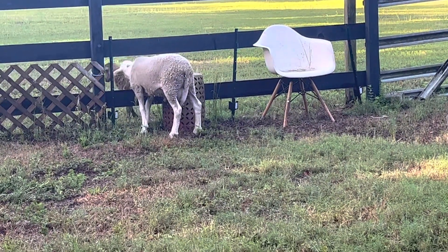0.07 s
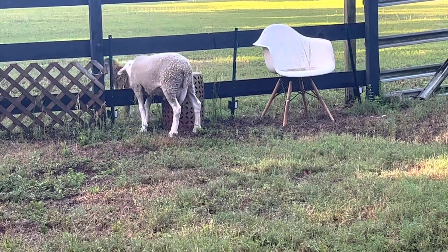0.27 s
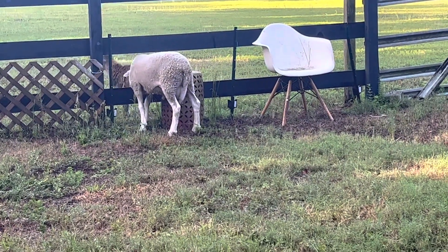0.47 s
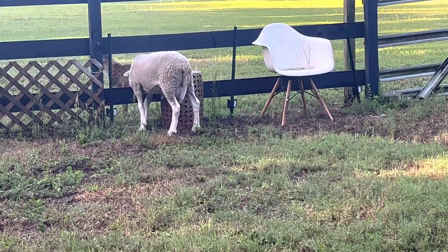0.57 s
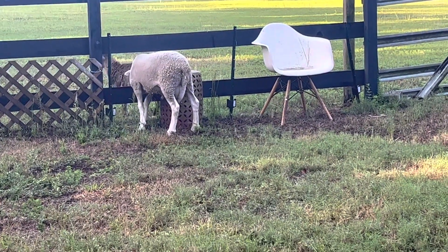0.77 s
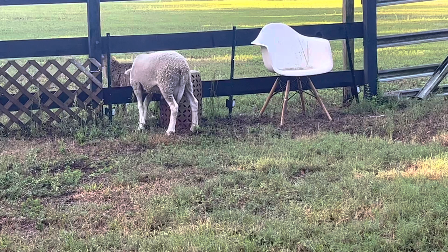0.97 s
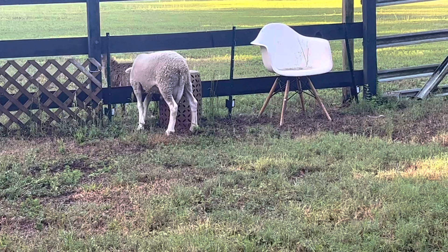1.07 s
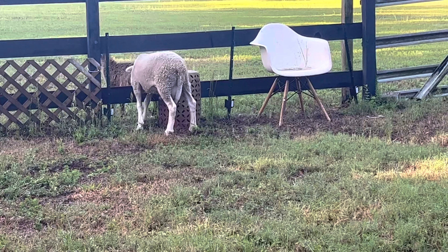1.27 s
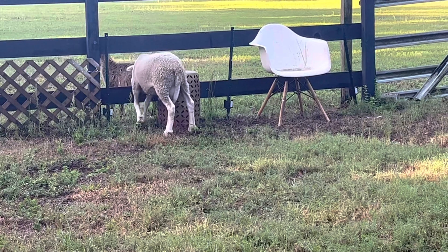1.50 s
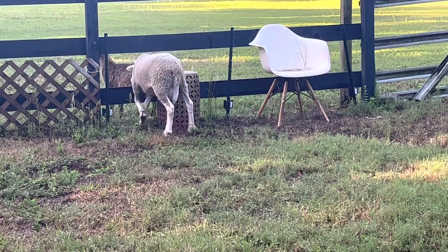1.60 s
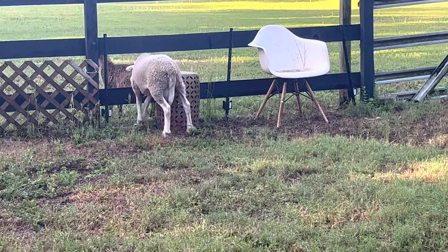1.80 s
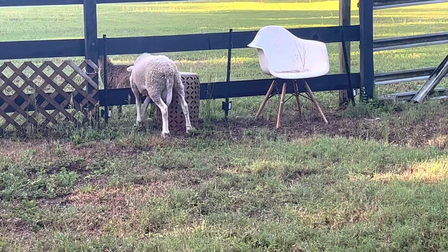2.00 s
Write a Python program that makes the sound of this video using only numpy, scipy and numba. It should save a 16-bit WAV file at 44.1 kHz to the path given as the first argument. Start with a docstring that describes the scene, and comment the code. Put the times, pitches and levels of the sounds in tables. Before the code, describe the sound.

A lamb bleats once: a soft closed-mouthed quaver from 0.3 seconds opens near 0.6 into a bright, nasal, wavering call, falling and fading by 1.2 with a thin outdoor echo. Low traffic rumble, faint machine hum and far frogs continue throughout. Cricket chirps come near 0.15, 0.5, 1.25 and 1.65; an insect buzzes from 0.8 to 1.2. Dry grass rustles faintly, with crisp snaps around 1.3 to 1.6.

```python
"""A lamb bleats once in a paddock: a closed-mouthed quaver opens into a bright wavering call, made by
source and filter: pulsed voice and rasp ring throat and mouth. Decaying noise makes echoes off fences and trees.
Around it lie shaped-noise traffic rumble and air, a machine hum as a sine, a far frog chorus of gated noise,
cricket chirps of short tone pulses, an insect buzz of filtered clicks, and dry grass ticking and
rustling under hooves, as filtered impulses."""
import sys
import numpy as np
from scipy import signal
from scipy.fft import rfft, irfft
from scipy.io import wavfile
from scipy.ndimage import uniform_filter1d
from numba import njit

SR = 44100
rng = np.random.default_rng(int(sys.argv[2]) if len(sys.argv) > 2 else 0)


def generate_wav(signal):
    """Clip the signal to [-1, 1] and save it as 16-bit WAV at the path in sys.argv[1]."""
    frames = np.transpose(np.atleast_2d(signal))
    scaled = np.clip(frames, -1, 1) * 32767
    pcm = np.round(scaled).astype(np.int16)
    wavfile.write(sys.argv[1], SR, pcm)


N = 90404


def undb(db):
    """Amplitude ratio of a level in dB: twenty dB per decade."""
    return 10 ** (np.asarray(db) / 20)


def unit(x):
    """Normalization to an effective (rms) value of one."""
    return x / np.sqrt(np.mean(x ** 2))


def curves(table):
    """Linear interpolation of a time table: each column after the first, one value per sample."""
    rows = np.array(table, float)
    return [np.interp(np.arange(N) / SR, rows[:, 0], column) for column in rows[:, 1:].T]


def by_hz(table, hz, order=1):
    """Interpolation of one column of a frequency table along a logarithmic frequency axis."""
    rows = np.array(table, float)
    return np.interp(np.log(hz + 1), np.log(rows[:, 0]), rows[:, order])


@njit
def svf(x, hz, width, sr):
    """State-variable resonator: a band-pass with movable centre and width, gain 1 at the centre."""
    y, b, l = np.empty(len(x)), 0., 0.
    for i in range(len(x)):
        g, k = np.tan(np.pi * hz[i] / sr), width[i] / hz[i]
        v = (b + g * (x[i] - l)) / (1 + g * (g + k))
        b, l, y[i] = 2 * v - b, l + 2 * g * v, k * v
    return y


def band(x, hz, width_hz):
    """Cascaded resonance: two equal band-passes, each of the given width, for steep skirts."""
    centre, width = hz + np.zeros(N), width_hz + np.zeros(N)
    once = svf(x, centre, width, 1. * SR)
    return svf(once, centre, width, 1. * SR)


def walk(rate):
    """Low-passed random fluctuation that turns about rate times a second, rms 1."""
    k = int(SR / rate)
    return unit(uniform_filter1d(uniform_filter1d(rng.standard_normal(N), k), k))


def air():
    """Shaped noise of partial coherence: traffic rumble, open air and a far insect hiss, flickering by band."""
    # Each row: frequency in Hz, power density in dB per Hz.
    spectrum = [(20, -100), (32, -81.5), (55, -66.5), (90, -71), (125, -74.5), (200, -88), (300, -94.5),
                (500, -107), (1000, -113), (1500, -113), (2400, -121), (4000, -125), (5800, -127),
                (6800, -113), (8500, -112), (9700, -114), (10600, -130), (13500, -131), (16000, -140)]
    # Each row: frequency in Hz, likeness of left and right from 0 to 1.
    likeness = [(60, 1), (200, 0.8), (400, 0.52), (1200, 0), (2200, 0.73)]
    flicker_db = .8
    hz = np.fft.rfftfreq(N, 1 / SR)
    alike = np.clip(by_hz(likeness, hz), 0, 1)
    mid, side = rfft(rng.standard_normal((2, N))) * undb(by_hz(spectrum, hz)) * np.sqrt(SR / 2)
    shared, differing = mid * np.sqrt(1 + alike), side * np.sqrt(1 - alike)
    both = np.array([shared + differing, shared - differing]) / np.sqrt(2)
    # Overlapping third-octave bands, each with its own fluctuation of level.
    place = 3 * np.log2(hz / 20 + 1)
    out = 0
    for k in range(31):
        part = irfft(both * np.clip(1 - abs(place - k), 0, 1), N)
        out = out + part * undb(flicker_db * walk(10.0))
    return out


def hum():
    """Frequency-modulated sine: one machine tone with a wandering level."""
    # Each row: time in seconds, frequency in Hz, rms level in dB before the wander.
    tone_path = [(0.0, 138.5, -43.5), (0.02, 141.4, -62.5), (0.11, 140.7, -63.5), (0.67, 141.1, -52),
                 (0.77, 140.7, -54), (1.39, 140.5, -56.5), (1.81, 139.2, -62.5), (2.04, 140.1, -60.5),
                 (2.05, 130, -48.5)]
    hz, db = curves(tone_path)
    phase = 2 * np.pi * np.cumsum(hz) / SR
    return np.sqrt(2) * undb(db + 1.0 * walk(45)) * np.sin(phase)


def throb(rate, sharp):
    """Amplitude gating: an even power of a sine gives rate pulses a second, narrower as sharp grows."""
    return np.sin(np.pi * np.cumsum(rate + np.zeros(N)) / SR) ** (2 * sharp)


def frogs():
    """Pulsed resonance: each far caller is gated noise near one pitch, its balance drifting left and right."""
    # Each row: time in seconds, chorus level in dB before the ceiling, pitch in Hz before each caller's wander.
    chorus = [(0.0, -76, 1788), (0.16, -62, 1784), (0.18, -69.5, 1810), (0.5, -63.5, 1756),
              (0.54, -79, 1990), (0.55, -64, 1850), (0.96, -66, 1815), (1.2, -67, 1765), (1.3, -64, 1824),
              (1.61, -73.5, 1826), (1.64, -66, 1773), (2.05, -76, 1858)]
    # Mean pulses per second of each caller.
    pulse_rates = [59.2, 86.7, 67.3, 43.2, 72.1, 58.64]
    width_hz, pitch_spread, ceiling_db = 133, 0.042, -64  # the spread is a fraction of the pitch
    db, hz = curves(chorus)
    out = 0
    for rate in pulse_rates:
        pulses = throb(rate * (1 + 0.0524 * walk(5.16)), sharp=2) * rng.standard_normal(N)
        caller = unit(band(pulses, hz * (1 + pitch_spread * walk(3)), width_hz))
        balance = undb(np.array([[1], [-1]]) * 5.4 * walk(13))
        out = out + caller * undb(1.2 * walk(0.7)) * balance
    return unit(out) * undb(np.minimum(db, ceiling_db))


def crickets():
    """Pulse trains of a modulated tone: each pulse sags in pitch and ends with a high tick of noise."""
    # Each row: start in seconds, number of pulses (rounded), tone level in dB before the blur.
    chirps = [(0.145, 8.7, -62), (0.498, 8.1, -62.5), (1.248, 9, -61.5), (1.6598, 8.4, -61)]
    pitch_hz, sag_hz = 8010, 300
    pulses_per_s, pulse_s, first_pulse_db = 91, 0.0105, -29  # the first pulse is this much weaker
    blur_db, tick_hz, tick_db = 3, 15000, 1
    t, out = np.arange(N) / SR, np.zeros(N)
    blur, waver = undb(blur_db * walk(300)), 1 + .012 * walk(400)
    ticks = undb(tick_db) * unit(band(rng.standard_normal(N), tick_hz, 1600))
    for start, count, db in chirps:
        for k in range(int(round(count))):
            progress = np.clip((t - start - k / pulses_per_s) / pulse_s, 0, 1)
            shape = np.sin(np.pi * progress) * undb(db + first_pulse_db * (k == 0))
            sagging_hz = pitch_hz * waver - sag_hz * progress ** 3
            tone = blur * np.sin(2 * np.pi * np.cumsum(sagging_hz) / SR)
            # The ticks strengthen towards the last pulse of the chirp.
            out += shape * (tone + progress ** 4 * ticks * ((k + 1) / count) ** 2)
    return out


def buzz():
    """Impulse excitation of a resonance: another insect's strong and weak clicks, slowing through one buzz."""
    start_s, end_s, centre_hz, width_hz = .81, 1.208, 7140, 560
    pairs_per_s, slowing = 120, 10  # slowing in pairs per second per second
    level_db, weak_db = -64.5, -8.5
    t = np.arange(N) / SR
    turns = np.cumsum(pairs_per_s - slowing * (t - start_s)) / SR
    clicks = np.diff(np.floor(2 * turns), prepend=0)
    clicks = clicks * np.where(turns % 1 < .5, 1, undb(weak_db)) * undb(3.1 * walk(220))
    on = np.clip(np.minimum((t - start_s) / 0.037, (end_s - t) / 0.083), 0, 1)
    return undb(level_db) * on * unit(band(clicks, centre_hz, width_hz))


def snaps():
    """Impulse response: dry stalks snap singly, each a sharp impulse with a short noisy tail."""
    # Each row: start in seconds, peak level in dB, centre in Hz, band-pass width in Hz.
    stalks = [(1.299, -61, 10830, 6100), (1.3066, -43.5, 9000, 11960), (1.314, -52, 5970, 6030),
              (1.323, -46.5, 5400, 2980), (1.334, -66, 10820, 6954), (1.3443, -39, 6970, 11800),
              (1.4024, -44, 6140, 9640), (1.418, -50, 6960, 9000), (1.456, -60, 8400, 4030),
              (1.496, -57, 4114, 5950), (1.5275, -55.5, 6500, 4000), (1.6181, -51.5, 7230, 14070)]
    decay_s, tail = 0.0009, 0.13
    t, out = np.arange(N) / SR, np.zeros(N)
    noise = rng.standard_normal(N)
    for start, db, hz, width in stalks:
        u = np.maximum(t - start, 0)
        strike = np.exp(-u * SR) + tail * noise * np.exp(-u / decay_s)
        snap = band((t >= start) * strike, hz, width)
        out += undb(db) * snap / abs(snap).max()
    return out


def rustle():
    """Shot noise: dense random grains of uneven strength merge into the fine rustle of dry grass."""
    # Each row: time in seconds, level in dB.
    swell = [(0.5, -84), (0.628, -84), (0.795, -75), (0.82, -69), (1.082, -77), (1.348, -68), (1.354, -75),
             (1.392, -81), (1.4, -75), (1.556, -89), (1.591, -114), (1.621, -74), (1.63, -74), (1.65, -70)]
    grains_per_s, centre_hz, width_hz, scatter_db = 11000, 8300, 25000, 2.6
    t = np.arange(N) / SR
    struck = rng.random(N) < grains_per_s / SR
    grains = struck * rng.standard_normal(N) * undb(scatter_db * rng.exponential(size=N))
    on = np.clip(np.minimum(t - swell[0][0], swell[-1][0] - t) / .03, 0, 1)
    return on * undb(curves(swell)[0]) * unit(band(grains, centre_hz, width_hz))


def lamb():
    """Source and filter: pulses and rasp swelling once a cycle ring mouth and throat; a sine is the chest tone."""
    # Two lists, murmured start and open call. Each row: time in seconds, pitch in Hz, then levels in dB
    # of the fundamental, the mouth resonance (its gain) and the treble.
    bleat = [
        [(0.3, 231.5, -69, -81, -88), (0.324, 244.6, -51.5, -62, -76.5), (0.344, 274.2, -54, -60.5, -66),
         (0.354, 264.3, -49, -54.5, -89), (0.362, 266, -80, -73, -70), (0.368, 264.4, -57, -77, -72),
         (0.378, 272.5, -60, -94, -72), (0.39, 307.5, -53, -60, -66.5), (0.4, 313.4, -51, -61.5, -64.5),
         (0.414, 305.9, -44.5, -54.5, -68.5), (0.43, 316, -56, -67, -90), (0.442, 310.4, -69, -87, -69.5),
         (0.456, 307.5, -54.5, -68.5, -106), (0.47, 320.3, -51, -51.5, -79), (0.48, 326.5, -48.5, -61, -70.5),
         (0.494, 308, -55, -57, -65), (0.506, 300.5, -51, -73, -59), (0.514, 302.6, -56, -54, -55),
         (0.528, 341.6, -54, -46.5, -46.5), (0.54, 354.6, -61, -43.5, -44), (0.55, 325, -52, -41, -46),
         (0.558, 306, -84, -48, -56), (0.564, 312.6, -68, -52.5, -48), (0.574, 317, -65, -44, -50.5),
         (0.59, 343.3, -50.5, -42.5, -39.5)],
        [(0.596, 356.4, -61, -42.5, -43.5), (0.62, 356.6, -51, -35.5, -40), (0.634, 365.3, -55.5, -31.5, -39.5),
         (0.656, 334, -61, -37.5, -41.5), (0.682, 362.1, -54.5, -34.5, -42), (0.696, 346.7, -57, -36.5, -43.5),
         (0.712, 354.5, -56, -36.5, -45), (0.726, 344.5, -60, -40.5, -43.5), (0.746, 358.6, -55.5, -34, -42),
         (0.76, 340.7, -55, -37.5, -41.5), (0.78, 354, -62, -42.5, -43.5), (0.79, 336.6, -60, -41.5, -45.5),
         (0.806, 344.4, -61, -38, -41), (0.818, 353.4, -58, -38.5, -42), (0.852, 352.6, -59.5, -38.5, -46),
         (0.864, 339.4, -55.5, -41, -41), (0.874, 335.5, -64, -44.5, -43.5), (0.902, 345.8, -59, -41.5, -43),
         (0.924, 366.3, -56.5, -31, -44.5), (0.936, 353.9, -60, -33, -46), (0.95, 341, -57, -42, -43),
         (0.97, 360.3, -58, -34.5, -40), (0.98, 349.7, -58, -30.5, -47.5), (0.996, 334.2, -59, -51, -42),
         (1.004, 329.6, -74, -49.5, -48.5), (1.034, 344.5, -55.5, -40.5, -41), (1.044, 330.7, -64, -38, -44.5),
         (1.054, 312.2, -92, -53, -51.5), (1.062, 313.9, -55.5, -54, -47), (1.072, 317, -66.5, -65, -50),
         (1.104, 336.2, -64.5, -33.5, -45.5), (1.118, 308, -60, -48, -55.5), (1.128, 296.3, -72, -58, -50.5),
         (1.15, 269.8, -69, -62, -61), (1.166, 249.1, -70.5, -71, -70), (1.186, 232.4, -72, -85, -62),
         (1.21, 205, -68, -70, -74)],
    ]
    # Each row: time in seconds, mouth resonance in Hz, its width in Hz, second resonance in Hz,
    # opening from 0 to 1, stretch of the throat resonances as a factor.
    mouth_path = [(.3, 520, 300, 2635, .1, 1.11), (.48, 599, 297, 2200, 0.4, 0.91),
                  (.51, 710, 250, 2020, 0.28, 0.96), (.55, 822, 250.6, 2460, 0.49, 0.95),
                  (.6, 1009, 166, 2640, 0.86, .99), (.68, 1016, 172, 2674, 1, 1.003),
                  (.9, 1012, 163, 2706, 0.84, 1.006), (1.0, 982, 158, 2670, .95, 0.994),
                  (1.1, 951, 139, 2620, 0.82, 1.062), (1.19, 1013, 120.9, 2550, 0.67, 1.12)]
    # Each row: resonance in Hz before the stretch, width in Hz, relative gain in dB with the mouth open,
    # the same with it closed.
    throat_modes = [(1347, 1260, -16, -9), (2107, 214, -15, -9), (3110, 360, -8.5, -15.5),
                    (3608, 256, -2, -12.5), (4180, 335, -9.5, 2.5), (4635, 150, -19, -24),
                    (5400, 700, -37, -15), (6500, 1530, -16.5, -20.5)]
    # Each row: time in seconds, level of the voice's top treble in dB.
    shrill_path = [(.5, -85), (.57, -73), (.6, -62.5), (.62, -67), (.635, -64), (.66, -78), (.682, -51.5),
                   (.7, -85), (.8, -91), (1.1, -94)]
    # Each row: time in seconds, gain of the rasp in dB.
    rasp_path = [(.3, -6), (.48, -7), (.51, -5), (.54, -8), (.565, -5), (.6, -10), (.68, -12), (.97, -12),
                 (1.0, -8), (1.1, -3), (1.19, 1)]
    harmonics, second_width_hz = 15, 415
    jitter, shimmer_db, rasp_low_db = 0.003, 1, -27  # jitter is a fraction of the pitch
    t = np.arange(N) / SR
    hz, low_db, mouth_db, top_db = curves(bleat[0] + bleat[1])
    mouth_hz, width_hz, second_hz, opening, stretch = curves(mouth_path)
    wavering_hz = uniform_filter1d(hz, size=200) * (1 + jitter * walk(180))
    phase = 2 * np.pi * np.cumsum(wavering_hz) / SR
    pulses = sum(np.cos(k * phase) for k in range(1, harmonics + 1))
    pulses = pulses * undb(shimmer_db * walk(69)) * np.sqrt(2)
    gusts = rng.standard_normal(N) * (1 + np.cos(phase)) * 4
    shrill = undb(curves(shrill_path)[0]) * unit(band(gusts, hz=9000, width_hz=2000))
    rasp = undb(curves(rasp_path)[0]) * gusts
    rough = pulses + rasp
    throat = band(rough, second_hz, second_width_hz)
    for k, (mode_hz, mode_width, open_db, shut_db) in enumerate(throat_modes):
        gain_db = shut_db + (open_db - shut_db) * opening + 2.0 * walk(27)
        # Neighbouring resonances alternate in sign.
        throat = throat + (-1) ** k * undb(gain_db) * band(rough, mode_hz * stretch, mode_width)
    mouth = undb(mouth_db) * band(pulses + undb(rasp_low_db) * rasp, mouth_hz, width_hz)
    chest_tone = undb(low_db) * np.sqrt(2) * np.cos(phase)
    on = np.clip(np.minimum(t - bleat[0][0][0], bleat[1][-1][0] - t) / 0.0054, 0, 1)
    return on * (chest_tone + mouth + undb(top_db) * unit(throat) + shrill)


def echoes(x):
    """Exponential reverberant decay: all start together; near fences fade fast, far trees ring thinly and long."""
    wait_s, side_db = 0.0033, -5  # side: what differs between left and right
    # Each row: level in dB of the part both sides share, decay by 60 dB in seconds, low cut in Hz, stir.
    answers = [
        (-7, .26, 490, 1),  # near fences
        (-10, 1.0, 1800, walk(450)),  # far trees, smeared by moving leaves
        (-25.5, 1.0, 400, walk(1200)),  # a faint, fully blurred wash that keeps more of the lows
    ]
    t, out = np.arange(SR) / SR, 0
    for db, t60, low_hz, stir in answers:
        mid, side = rng.standard_normal((2, SR))
        decay = undb(db - 60 * t / t60) * np.sqrt(2 * np.log(1000) / t60 / SR) * (t > wait_s)
        tail = (mid + np.array([[1], [-1]]) * undb(side_db) * side) * decay
        thin = signal.sosfilt(signal.butter(4, low_hz, "high", fs=SR, output="sos"), x * stir)
        out = out + signal.fftconvolve(thin[None], tail, axes=1)[:, :N]
    return out


def scene():
    """Superposition: the voice and its echoes, placed by level and phase between the sides, over the paddock."""
    # Each row: frequency in Hz, left minus right in dB, radians by which right leads.
    lamb_place = [(300, -1, 0), (700, .5, .1), (1050, 5.5, -.3), (1500, 0, .3), (2500, -1.5, -.3),
                  (4000, 0, 0)]
    voice, hz = lamb(), np.fft.rfftfreq(N, 1 / SR)
    lean = undb(by_hz(lamb_place, hz) / 2) * np.exp(-.5j * by_hz(lamb_place, hz, order=2))
    heard = irfft(rfft(voice + echoes(voice)) * np.array([lean, 1 / lean]), N)
    return heard + air() + hum() + frogs() + crickets() + buzz() + snaps() + rustle()


def record(dry):
    """Interaural-style phase difference: two close ports share one treble, turned apart in phase; top cut."""
    # Each row: frequency in Hz, radians by which the right port leads.
    port_phase = [(4000, 0), (5000, 0), (6200, .8), (7100, 1.5), (8500, 3.14), (10000, 4.5), (11000, 6.25),
                  (13100, 6.35), (14000, 9), (15300, 10.2)]
    mono_above_hz, top_hz = 3100, 15850
    hz = np.fft.rfftfreq(N, 1 / SR)
    left, right = rfft(dry)
    mid = (left + right) / 2
    side = (left - right) / 2 / (1 + (hz / mono_above_hz) ** 6)
    turn = np.exp(-.5j * by_hz(port_phase, hz))
    out = irfft(np.array([(mid + side) * turn, (mid - side) / turn]), N)
    return signal.sosfilt(signal.ellip(10, .2, 80, top_hz, fs=SR, output="sos"), out)


dry = scene()
out = record(dry)
generate_wav(out)
```